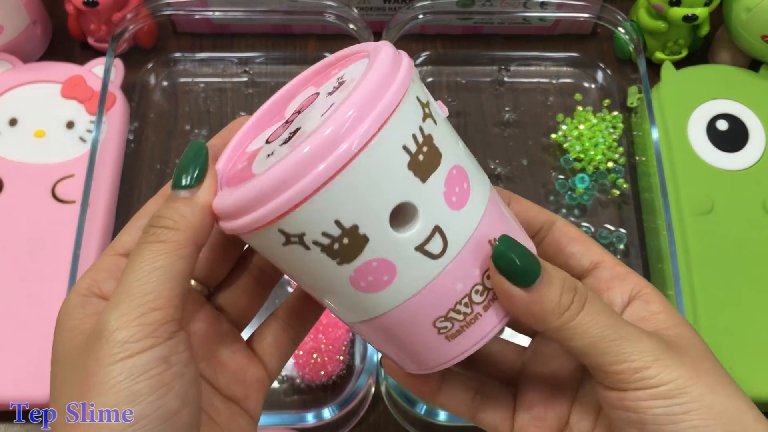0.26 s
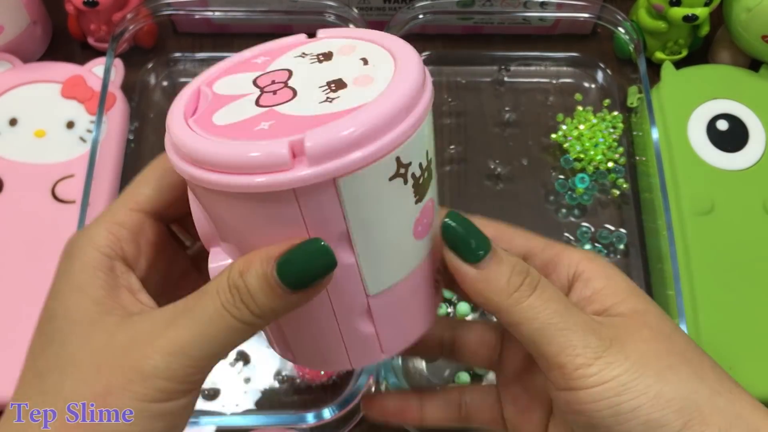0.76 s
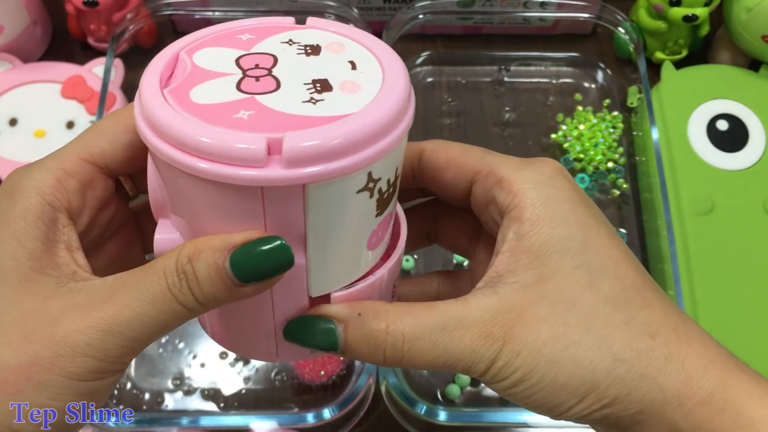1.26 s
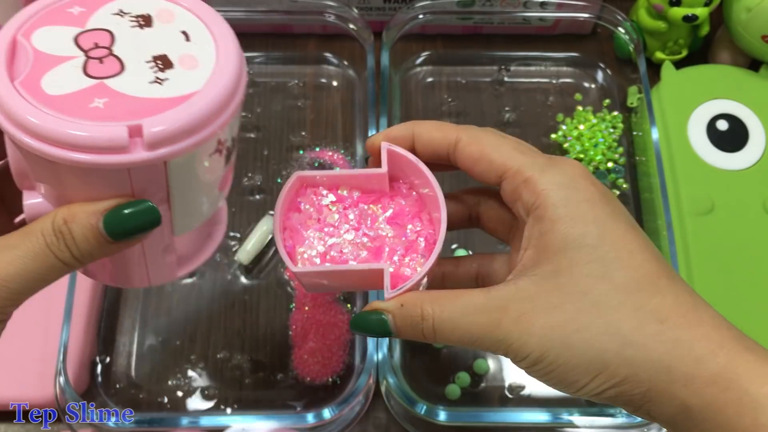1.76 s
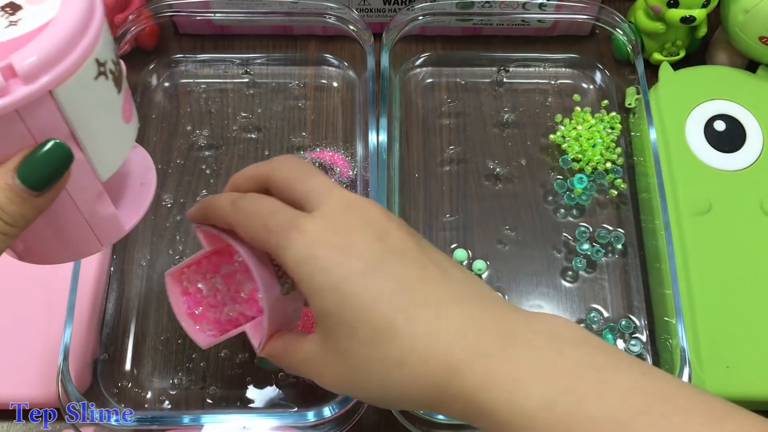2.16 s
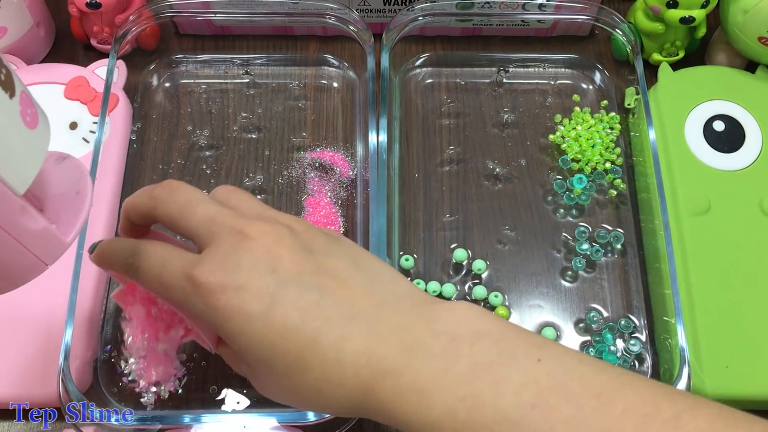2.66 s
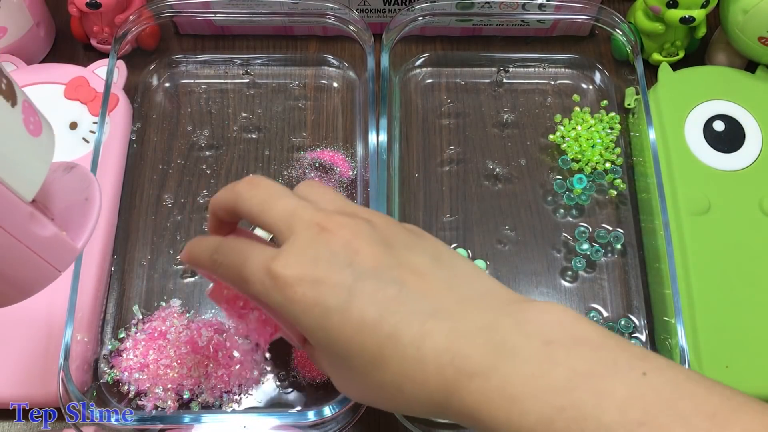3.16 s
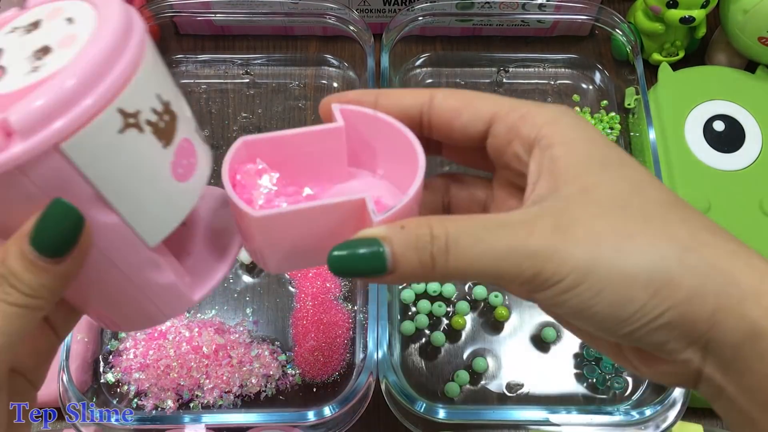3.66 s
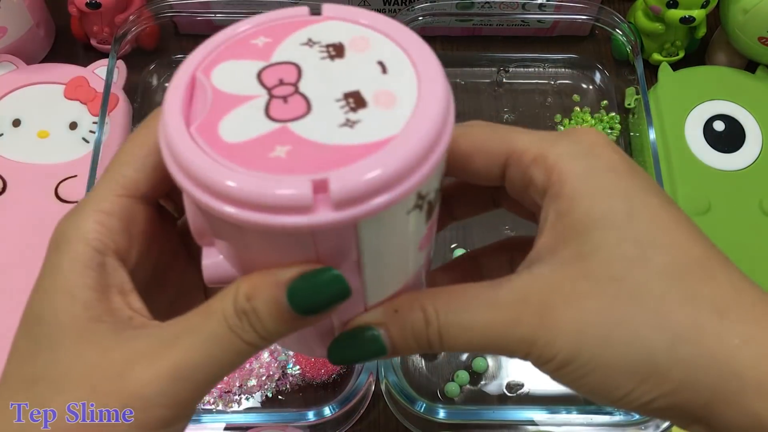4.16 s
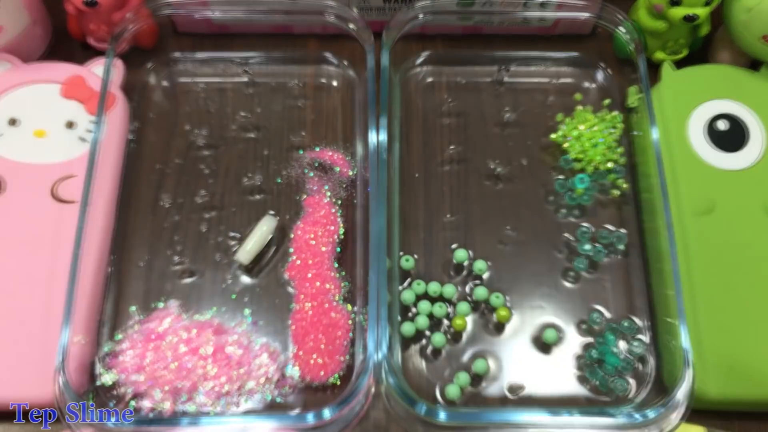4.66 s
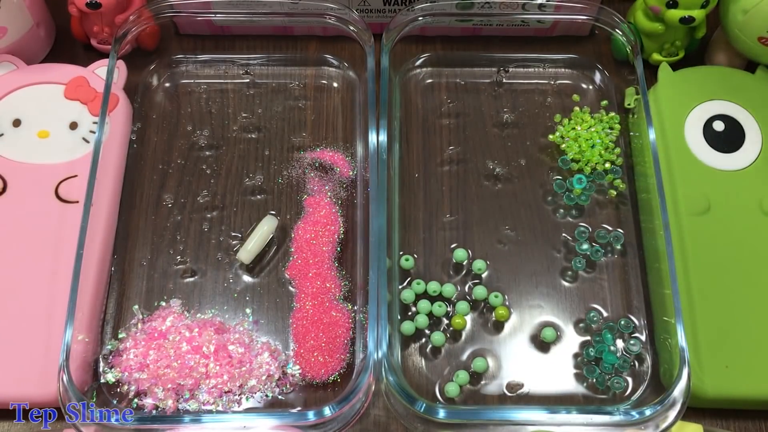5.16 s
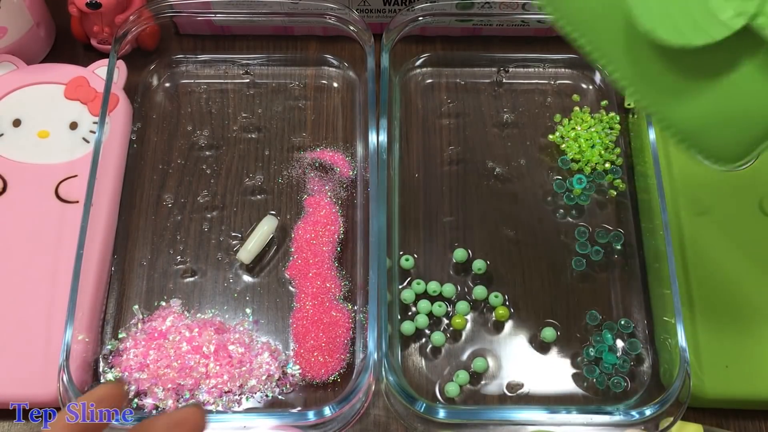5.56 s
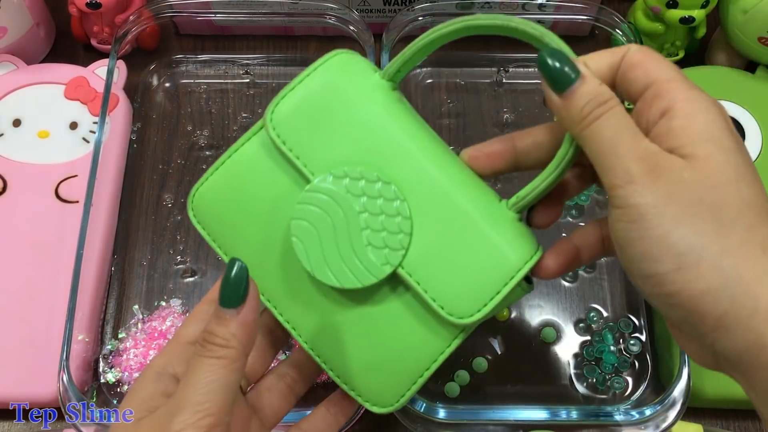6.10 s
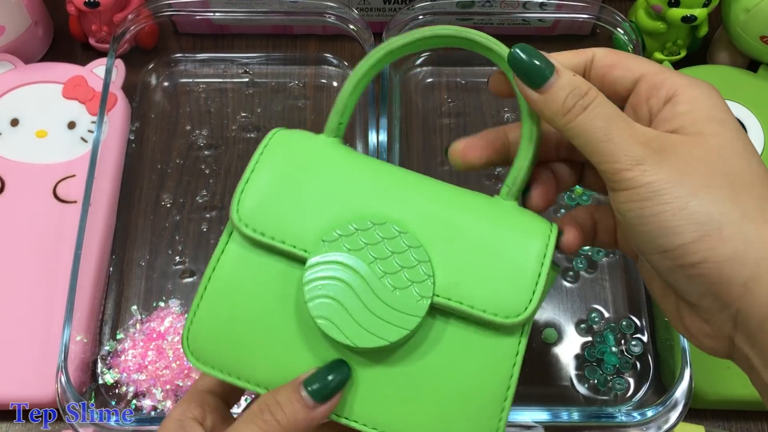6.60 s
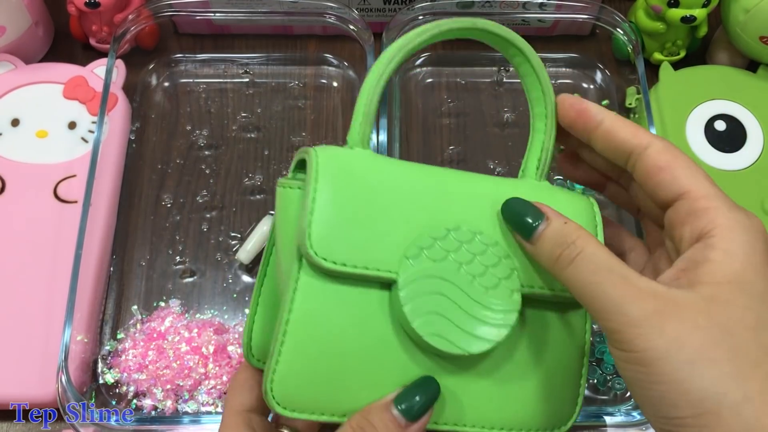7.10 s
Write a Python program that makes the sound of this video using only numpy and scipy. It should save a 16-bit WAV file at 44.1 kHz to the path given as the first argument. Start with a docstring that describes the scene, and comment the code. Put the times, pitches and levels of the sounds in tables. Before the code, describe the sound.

Close up in a small hard room, fingers tap a hollow plastic cup, then its drawer cracks open and scrapes out. Fine glitter hisses faintly onto glass in several shakes. The drawer clatters back with a dense run of loud clicks and a final snap. After a quiet gap, a stiff little handbag is handled with knocks, rustles and creaks over a faint low hum.

```python
"""A hollow plastic cup is tapped, its drawer slides out, snaps, and clatters back in: each contact rings
the cup's modes and cracks with noise, and scraping is rough noise, partly through the cup's resonances.
Glitter hisses into a glass dish; a stiff little handbag is lifted and fingered, with knocks, rustles and
creaks. A small hard room answers with echoes and a fading tail of noise; a far machine hums."""
import sys
import numpy as np
from scipy import signal
from scipy.fft import rfft, irfft, next_fast_len
from scipy.io import wavfile
from scipy.ndimage import uniform_filter1d

SR = 44100
rng = np.random.default_rng(int(sys.argv[2]) if len(sys.argv) > 2 else 0)


def store_pcm(level_fs):
    """Save levels as 16-bit WAV."""
    pcm = np.round(np.clip(level_fs, -1, 1) * 32767).astype(np.int16)
    wavfile.write(sys.argv[1], SR, np.atleast_2d(pcm).T)


N = 323694  # samples in the scene
DIRECTIONS = 8  # each contact is made in this many versions, one for each way the sound leaves


def amp(db):
    """Turns dB into gain."""
    return 10 ** (np.asarray(db) / 20)


def unit(x):
    """Scales a sound to an rms of 1."""
    return x / np.sqrt(np.mean(x ** 2) + 1e-20)


def filtered(x, response):
    """Multiplies the spectrum of x by a response that depends on frequency."""
    size = next_fast_len(len(x) + 8192)  # padding keeps the end from wrapping onto the start
    spectrum = rfft(x, size) * response(np.fft.rfftfreq(size, 1 / SR))
    return irfft(spectrum, size)[:len(x)]


def along(points, hz):
    """Reads a curve of (f/Hz, value) points on a log frequency axis."""
    f, value = np.transpose(points)
    return np.interp(np.log(hz + 1), np.log(f), value)


def level(rows, column):
    """Gain for every sample from a dB column against time; -140 dB outside the table."""
    rows = np.array(rows)
    return amp(np.interp(np.arange(N) / SR, rows[:, 0], rows[:, column], -140, -140))


def grit(spectrum, spread_db):
    """Dense tiny impacts: coloured noise whose strength jumps at random every 32 samples, rms 1."""
    size_db = abs(spread_db) * rng.exponential(size=N // 32 + 1).clip(0, 5)
    size = amp(size_db).repeat(32)[:N]
    return unit(filtered(size * rng.standard_normal(N), lambda hz: amp(along(spectrum, hz))))


def resonant(modes, spread_db):
    """Dense small slips excite a few resonances, each a peak in the response, rms 1."""
    def peaks(f):
        response = 0
        for k, (centre, width, db) in enumerate(modes):
            peak = 1j * f * width / (centre * centre - f * f + 1j * f * width)
            response = response + (-1) ** k * amp(db) * peak  # neighbours have opposite signs
        return response
    return unit(filtered(grit([(100, 0), (10000, 0)], spread_db), peaks))


def ring(hz, t):
    """A leading mode with two close, weaker neighbours: plastic never rings pure."""
    near = hz * (1 + 0.025 * rng.standard_normal((2, DIRECTIONS, 1)))
    return np.sin(2 * np.pi * hz * t) + .7 * np.sin(2 * np.pi * near * t).sum(axis=0)


def burst(lo_hz, hi_hz, t):
    """A band of noise starting at the contact, different in each direction."""
    band = signal.butter(3, [lo_hz, min(hi_hz, SR / 2.1)], "bandpass", fs=SR, output="sos")
    return unit(signal.sosfilt(band, rng.standard_normal((DIRECTIONS, len(t)))))


def dying(x, db, t60, t, rise):
    """Puts x under a quick rise and an exponential decay; its peak, averaged over directions, is at db."""
    x = x * (1 - np.exp(-t / rise)) * amp(-60 * t / t60)
    return amp(db) * x / np.abs(x).max(axis=1).mean()


def heard(s, hits, wet_db, out):
    """Adds a contact at s seconds: one direction comes straight, four off the walls, all feed the room tail."""
    # how long the room rings: (f/Hz, t60/s)
    room_decay = [(500, 0.06), (1200, 0.65), (3000, 0.64), (7000, 0.53), (11000, .42), (15000, 0.25)]
    # echoes from the table and near walls: (delay/s, level/dB)
    wall_echoes = [(.006, -24.5), (0.011, -21), (.017, -25.5), (.026, -29)]
    hz, t, noise = signal.stft(rng.standard_normal(SR // 2 + 8192), SR, nperseg=512)
    power = np.mean(np.abs(rfft(hits, 2048)) ** 2, axis=0)
    colour = np.sqrt(uniform_filter1d(power, size=4)[::4])  # the contact's own spectrum, smoothed
    decay = amp(-60 * t / along(room_decay, hz)[:, None])
    tail = signal.istft(noise * colour[:, None] * decay, SR, nperseg=512)[1]
    tail *= 1 - np.exp(-np.arange(len(tail)) / SR / 0.0057)  # the diffuse field builds up
    # the tail's energy is wet_db relative to the average direction
    tail *= amp(wet_db) * np.linalg.norm(hits) / np.sqrt(DIRECTIONS) / np.linalg.norm(tail)
    for hit, (delay, db) in zip(hits, [(0.00019, 0.0015)] + wall_echoes):
        tail[round(delay * SR):][:len(hit)] += amp(db) * hit
    return out + np.pad(tail, (round(s * SR), N))[:N]


def room_tone():
    """Steady air noise and a far machine's hum: narrow noise bands that waver, with steady tones."""
    # colour of the air noise: (f/Hz, relative level/dB)
    air_colour = [(76, -46.5), (130, -12.5), (187, -1.5), (211, -5), (309, -6.5), (410, -10.5),
                  (565, -14.5), (1100, -18.5), (1240, -18.5), (1890, -20.5), (2140, -20.5), (3530, -22),
                  (16000, -25.5)]
    # parts of the hum: (f/Hz, width/Hz, wavering level/dB, steady level/dB)
    hum_parts = [(64.9, 5.8, -64.5, -61.5), (96.4, 13, -64, -68.5), (105.3, 30, -66, -81),
                 (184.4, 36, -72.5, -78.5), (49.4, 3.5, -73, -73.5), (28.4, 22, -84.5, -99)]
    air_db = -66.5
    out = amp(air_db) * unit(filtered(rng.standard_normal(N), lambda hz: amp(along(air_colour, hz))))
    for centre, width, waver_db, steady_db in hum_parts:
        waver = filtered(rng.standard_normal(N), lambda hz: np.exp(-((hz - centre) / width) ** 2))
        steady = np.sin(2 * np.pi * (centre * np.arange(N) / SR + rng.random()))
        out = out + amp(waver_db) * unit(waver) + amp(steady_db) * unit(steady)
    return out


def glitter():
    """A hiss of countless flakes on glass, swelling with each shake; a few heard singly."""
    # single flakes: (t/s, peak/dB)
    flakes = [(2.5222, -46), (2.5506, -38), (2.5895, -53), (2.6938, -51), (2.7828, -47), (3.6177, -59.5),
              (3.64, -53.5), (3.6689, -67)]
    # glitter shaken out: (start/s, length/s, top level of the fine hiss/dB)
    surges = [(2.695, 0.14, -62.5), (2.888, 0.11, -62.5), (3.093, 0.069, -66.5), (3.243, 0.11, -72)]
    # glitter running between surges: (t/s, level of the fine hiss/dB)
    trickle = [(2.4, -79), (2.62, -68), (3.2, -66), (3.36, -78), (3.45, -79.5), (3.7, -70)]
    # colour of the hiss: (f/Hz, relative level/dB)
    colour = [(1470, -38), (2500, -12), (3280, -11.5), (3890, -4.5), (5270, -11), (6250, -3), (9960, -2.5),
              (15200, 0.5), (16000, -11)]
    out, t = np.zeros(N), np.arange(512) / SR
    for s, db in flakes:
        out = heard(s, dying(burst(11000, 15900, t), db, 0.019, t, rise=0.00038), -12, out)

    flow = level(trickle, 1)
    for s, length, db in surges:
        # a quick start, a slow swell to the top, then a quick stop
        swell = [(s - .02, db - 19), (s, db - 8), (s + length, db), (s + length + .04, db - 22)]
        flow = flow + level(swell, 1)
    fine_hiss = grit(colour, spread_db=2.0)
    coarse_ticks = amp(-6.5) * grit(colour, spread_db=5.5)
    return out + flow * (fine_hiss + coarse_ticks)


def bag():
    """Stiff coated fabric crackles and thuds; fingers rustle on it and the handle creaks."""
    # contacts: (t/s, peak of reference/dB, then relative to it: thud/dB, knock/dB, tick/dB)
    bag_contacts = [(5.4525, -42, -19, -9.5, -29), (5.5962, -42.5, -16, -19, -2),
                    (5.6353, -38, -24.5, -16, -18), (5.8995, -28.5, -37, -21.5, -15),
                    (5.915, -28, -39, -30, -20), (5.9244, -35, -23, -15, -28),
                    (5.9439, -29.5, -46, -22, -34), (5.9574, -44, -35, -16, -24),
                    (6.0025, -42, -14, -6, -19), (6.0267, -39, -24, -15, -17), (6.0706, -36, -30, -15, -14),
                    (6.186, -26, -27, -18, -4), (6.1954, -36, -8.5, -14, -25),
                    (6.2618, -30, -33, -8.5, -14), (6.2808, -32, -22, -12.5, -1),
                    (6.293, -32, -27, -25, -14), (6.3006, -31.5, -13.5, -24, -13),
                    (6.3805, -31.5, -23, -27, -19), (6.388, -44, -7, -15, -27),
                    (6.4096, -38, -37, -3, -26.5), (6.5054, -51, -31.5, 0, -27),
                    (6.6242, -51, -2.5, 0.5, -26), (6.7353, -37, -4.5, -5.5, -15),
                    (6.836, -51, -19, -4.5, -18), (6.8885, -38.5, -17, -6.5, -17),
                    (6.98, -27, -25.5, -18, -16), (6.9944, -32, -22, -9, -17.5),
                    (7.041, -37, -20, -17, -25), (7.0513, -28.5, -18, -4, -27),
                    (7.1354, -36.5, -20, -5.5, -16), (7.1583, -24.5, -35, -14.5, -17),
                    (7.225, -48.5, -4, 4, -9), (7.2565, -35.5, -27, -13, -29), (7.2896, -35, -33, -15, -11),
                    (7.3124, -38.5, -9, -11, -1.5)]
    # handling: (t/s, rustle level/dB, hollow boom level/dB)
    grip = [(5.4, -86.5, -99), (5.6, -68.5, -78), (5.85, -85, -87), (5.93, -62, -68.5), (6.07, -59.5, -68),
            (6.16, -71, -69), (6.2, -59, -63), (6.31, -70, -63.5), (6.4, -65, -64), (6.62, -62.5, -67),
            (6.72, -69, -74), (6.75, -66.5, -62.5), (6.92, -67.5, -72), (7.05, -50, -60), (7.17, -69, -71),
            (7.27, -69, -69.5), (7.34, -63.5, -62)]
    # handle rubbing in its loop: (t/s, creak level/dB, groan level/dB)
    strap = [(6.94, -85.5, -76), (6.962, -47, -68), (6.99, -54.5, -75.5), (7.036, -50, -61.5),
             (7.047, -61, -62), (7.061, -42, -46), (7.12, -69, -58), (7.163, -59.5, -67), (7.22, -72, -72)]
    # colour of the rustle: (f/Hz, relative level/dB)
    leather = [(590, -138), (1000, -4), (1260, 1), (1790, -2), (2680, 6), (4310, -6.5), (4840, -3),
               (9600, -9.5), (16000, -20.5)]
    # resonances of the air inside, the handle and the flexing soft walls: (f/Hz, width/Hz, relative level/dB)
    hollow = [(337.7, 43, -5.5), (605, 66, -0.5)]
    handle = [(735, 57, -1), (944, 46, 0.5), (1013, 43, -2), (1828, 67, 1), (1961, 61, -3), (2300, 49, -14),
              (2660, 56, -0.5)]
    fold = [(172, 270, -3), (326.1, 68, 2.5)]
    knock_hz, knock_scatter = 2380, 0.4  # middle pitch, and its random spread in natural-log units
    snap_db, snap_t60 = -5.5, 0.012  # dB relative to the reference, s
    out, t = np.zeros(N), np.arange(1024) / SR
    for s, peak_db, thud_db, knock_db, tick_db in bag_contacts:
        pitch = knock_hz * np.exp(knock_scatter * rng.standard_normal())
        knock = ring(pitch, t) + 1.7 * burst(930, 2270, t)
        hit = dying(burst(300, 730, t), thud_db, 3 * snap_t60, t, rise=0.0025)
        hit = hit + dying(knock, knock_db, 2.8 * snap_t60, t, rise=0.00028)
        hit = hit + dying(burst(2070, 7000, t), snap_db, snap_t60, t, rise=0.00013)
        hit = hit + dying(burst(6300, 12000, t), tick_db, 0.43 * snap_t60, t, rise=0.000099)
        out = heard(s, amp(peak_db) * hit, -9.5, out)

    rustle = level(grip, 1) * grit(leather, spread_db=4.0)
    boom = level(grip, 2) * resonant(hollow, spread_db=3.5)
    creak = level(strap, 1) * resonant(handle, spread_db=4.5)
    groan = level(strap, 2) * resonant(fold, spread_db=6.5)
    return out + rustle + boom + creak + groan


def drawer():
    """The drawer and fingers scrape along the cup: a hiss, and small slips that rattle the shell."""
    # strokes: (start/s, loudest/s, end/s, hiss/dB, rattle/dB, swell from the start/dB, fade to the end/dB)
    strokes = [(.7, .79, 1.05, -62, -64, 14, 26), (1.31, 1.387, 1.616, -54.5, -52.5, 15.5, 3),
               (1.58, 1.716, 1.72, -51, -41, 63, 1.5), (4.0, 4.12, 4.222, -46.5, -36, 15.5, 12.5),
               (4.46, 4.5, 6.1, -63, -64, 5, 73)]
    # colour of the hiss: (f/Hz, relative level/dB)
    rub = [(1760, -39.5), (3000, -7), (4860, -2), (5330, -11.5), (6300, -0.5), (7350, -6.5), (9800, -3),
           (16000, -15.5)]
    # cup modes woken by rubbing: (f/Hz, width/Hz, relative level/dB)
    shell = [(1090, 130, 0), (1720, 350, -9), (2150, 510, -5), (2620, 71, -2), (2530, 130, -4.5)]
    hiss, rattle = grit(rub, spread_db=2.0), resonant(shell, spread_db=-0.5)
    out = np.zeros(N)
    for start, top, end, hiss_db, rattle_db, swell_db, fade_db in strokes:
        swell = level([(start, -swell_db), (top, 0), (end, -fade_db)], 1)
        out = out + swell * (amp(hiss_db) * hiss + amp(rattle_db) * rattle)
    return out


def cup_blow(levels_db, spots_hz, t60, t):
    """One blow rings the cup's modes, most changed near the struck spots; high parts start and die sooner."""
    # modes: (f/Hz, relative level struck at its spot/dB, relative level struck elsewhere/dB)
    cup_modes = [(880, -4, -30), (1060, 1, -23.5), (1157, -1.5, -14.5), (1356, 0.5, -10), (1758, 0.5, -9),
                 (2044, -2, -9), (2400, 2.5, -8.5), (2680, 0.5, -6.5), (3100, 5.5, -16), (3675, -1.5, -10),
                 (4250, -5, -15.5), (4800, -0.5, -10.5), (5700, -3.5, -13), (6500, -0.5, -13),
                 (7200, -3, -12.5), (9770, -7, -14), (10900, -2, -15.5), (14600, -7, -17.5)]
    # noise of a contact: (from f/Hz, to f/Hz, relative level/dB)
    crack = [(1130, 2400, -4.5), (2300, 3900, -3), (4203, 8000, -3), (5573, 11000, -6),
             (10000, 41000, -6.5)]
    body_hz, wall_hz, edge_hz, tip_hz = 1500, 3040, 7600, 13000  # where the levels apply
    tip_follows = .3  # above the edge the slope from wall to edge carries on by this share
    spot_width, scatter_db = 0.14, 1.73  # octaves; random dB for each mode in each blow
    damping, rise_cycles = 0.25, 2.8  # t60 falls as Hz to this power; rise time constant in cycles
    body_db, wall_db, edge_db = levels_db
    tip_db = edge_db + tip_follows * (edge_db - wall_db)
    force = [(body_hz, body_db), (wall_hz, wall_db), (edge_hz, edge_db), (tip_hz, tip_db)]

    def part(x, hz, db):
        part_t60 = t60 * (wall_hz / hz) ** damping
        return dying(x, db + along(force, hz), part_t60, t, rise=rise_cycles / hz)

    hit = 0
    for hz, on_db, off_db in cup_modes:
        octaves_away = np.log2(hz / np.array(spots_hz))
        nearness = np.exp(-(octaves_away / spot_width) ** 2).max()
        mode_db = off_db + (on_db - off_db) * nearness + scatter_db * rng.standard_normal()
        hit = hit + part(ring(hz, t), hz, mode_db)
    for lo, hi, db in crack:
        hit = hit + part(burst(lo, hi, t), np.sqrt(lo * hi), db)
    small = signal.butter(4, 800, "highpass", fs=SR, output="sos")  # a small shell radiates little bass
    return signal.sosfilt(small, hit)


def cup():
    """Each contact on the hollow cup is a ringing, cracking blow with a low thump of noise beside it."""
    # contacts: (t/s, thump peak/dB, body/dB, wall/dB, edge/dB, low spot f/Hz, high spot f/Hz, t60 at wall/s)
    cup_contacts = [(.329, -93, -53, -58, -54, 1040, 4240, 0.0057),
                    (.396, -62, -52.5, -55, -59, 2560, 7690, 0.037),
                    (.4109, -66.5, -19, -20, -11.5, 3000, 11640, 0.028),
                    (.555, -53, -43, -47, -56, 2420, 6120, 0.025),
                    (.598, -80, -53, -67, -58, 1050, 6090, 0.017),
                    (.727, -74, -56, -60, -48, 1230, 6500, 0.011),
                    (.745, -59, -49, -55, -48, 2320, 5810, 0.013),
                    (.7923, -59, -37, -50, -44.5, 1080, 4000, 0.024),
                    (.808, -59, -55, -44, -52, 2400, 9350, 0.017),
                    (.898, -72, -68, -57.5, -54, 2430, 4250, .012),
                    (1.034, -49.5, -36, -53, -65, 1200, 6460, 0.012),
                    (1.203, -54.5, -28, -43.5, -52, 1517, 4560, 0.021),
                    (1.334, -71, -50, -63, -54, 1070, 8400, 0.042),
                    (1.381, -64.5, -46, -55, -59.5, 1049, 6150, 0.026),
                    (1.4353, -50.5, -32.5, -37.5, -25.5, 1070, 6500, 0.026),
                    (1.441, -40, -13, -10, -2, 1700, 6500, .014),
                    (1.544, -74, -45, -35.5, -24, 2430, 10100, 0.0075),
                    (1.749, -45, -14.5, -15.5, -15.5, 1444, 6880, 0.022),
                    (3.698, -73.5, -77, -60, -52, 3100, 10900, 0.01),
                    (3.77, -53, -19, -29, -32.5, 1177, 5500, 0.018),
                    (3.807, -39, -22, -23.5, -16, 3100, 10000, 0.025),
                    (3.9651, -37, -15, -18.5, -17, 1940, 5680, 0.051),
                    (3.97, -60.5, -17, -31, -16, 1124, 7500, 0.023),
                    (3.989, -52, -29.5, -28.5, -38.5, 1183, 4730, 0.037),
                    (3.998, -79, -25.5, -50, -48.5, 1106, 7400, 0.019),
                    (4.067, -49.5, -31, -38.5, -47.5, 1840, 5070, .021),
                    (4.081, -55, -26, -35.5, -45, 1960, 4760, 0.018),
                    (4.0911, -46, -10, -22.5, -25.5, 1233, 4040, 0.054),
                    (4.1, -41, -15.5, -35, -38.5, 1072, 4100, 0.0093),
                    (4.1191, -40.5, -15.5, -23, -25.5, 2410, 4620, 0.012),
                    (4.155, -42, -28.5, -24.5, -46, 1060, 6510, 0.018),
                    (4.162, -41.5, -22, -31.5, -15.5, 1180, 3990, 0.007),
                    (4.1646, -63, -10, -11, -15, 1049, 4600, 0.0065),
                    (4.219, -82, -29.5, -17, -19.5, 2526, 9700, .025),
                    (4.221, -33.5, -18, -14.5, -0.5, 1026, 5750, 0.0072),
                    (4.248, -52, -22, -29.5, -34, 1027, 7560, 0.013),
                    (4.51, -59, -47, -50, -45, 2900, 4840, 0.036),
                    (4.519, -53, -30, -59, -52, 910, 7560, 0.0039),
                    (4.584, -70.5, -70, -57, -46, 2800, 10900, 0.022),
                    (4.597, -59, -41.5, -67, -54, 887, 4520, 0.009),
                    (4.718, -86, -71, -52, -63, 2580, 4380, 0.021)]
    out, t = np.zeros(N), np.arange(2048) / SR
    for s, thump_db, body_db, wall_db, edge_db, low_hz, high_hz, t60 in cup_contacts:
        blow = cup_blow((body_db, wall_db, edge_db), (low_hz, high_hz), t60, t)
        thump = dying(burst(170, 720, t), thump_db, 0.67 * t60, t, rise=.002)
        out = heard(s, blow + thump, -12.0, out)
    return out


def scene():
    """Adds all the sources at one microphone."""
    return (room_tone() + glitter() + bag() + drawer() + cup())[None]


def record(dry):
    """The microphone has a few dips, cuts peaks flat at full scale and strongly weakens the top treble."""
    # the microphone's weak spots: (f/Hz, width/Hz, level/dB)
    mic_dips = [(5460, 130, -5), (8337, 850, -0.5), (11380, 500, -3.5)]
    top_hz = 15800  # the treble starts to fall here less 300 Hz

    def dips(hz):
        return amp(sum(db * np.exp(-((hz - centre) / width) ** 2) for centre, width, db in mic_dips))

    def band_limit(hz):
        return np.clip((top_hz + 300 - hz) / 600, .003, 1)

    clipped = np.clip(filtered(dry[0], dips), -1, 1)
    return filtered(clipped, band_limit)[None]


dry = scene()
out = record(dry)
store_pcm(out)
```